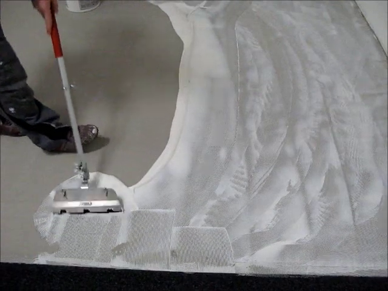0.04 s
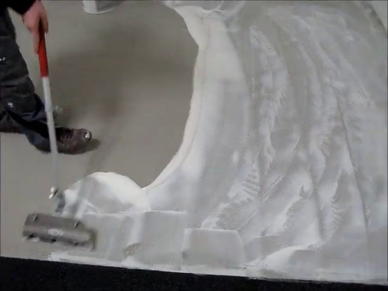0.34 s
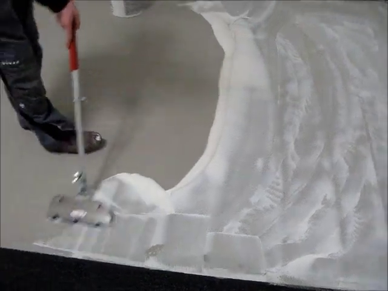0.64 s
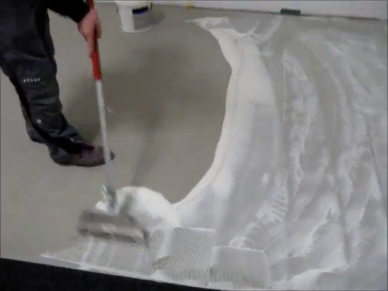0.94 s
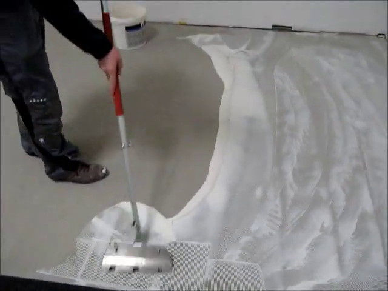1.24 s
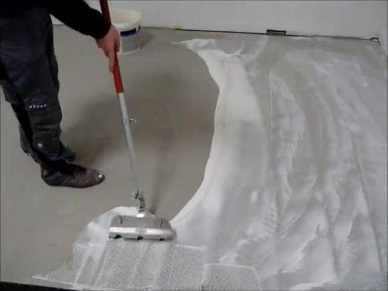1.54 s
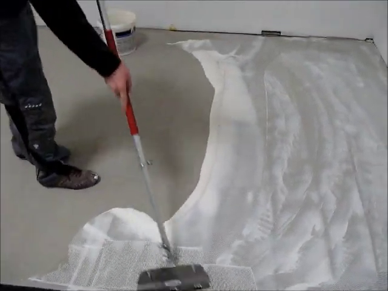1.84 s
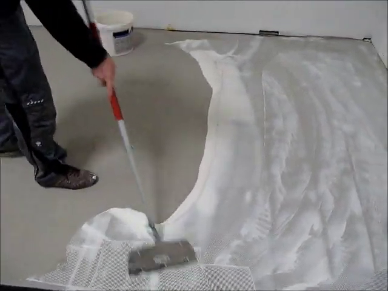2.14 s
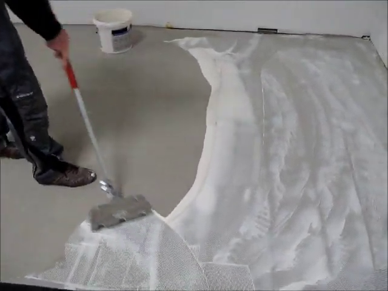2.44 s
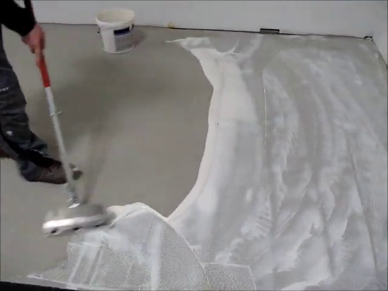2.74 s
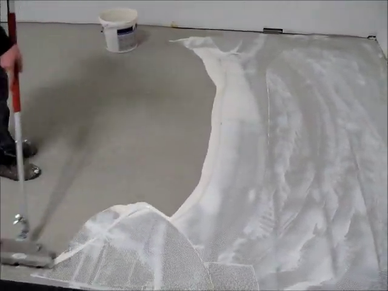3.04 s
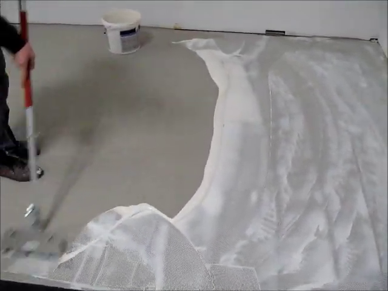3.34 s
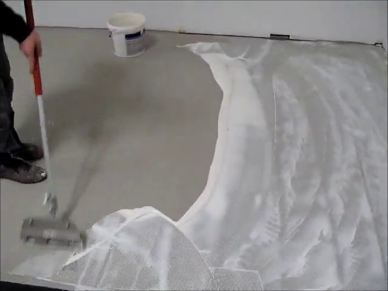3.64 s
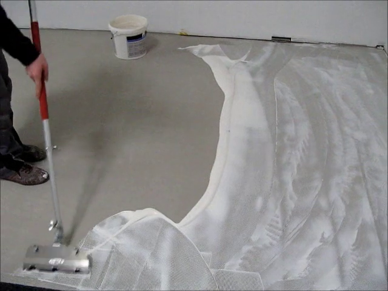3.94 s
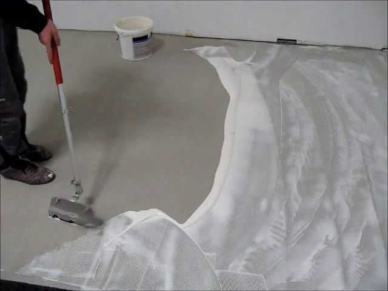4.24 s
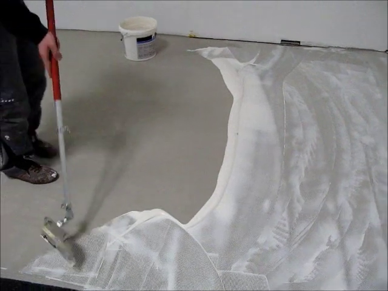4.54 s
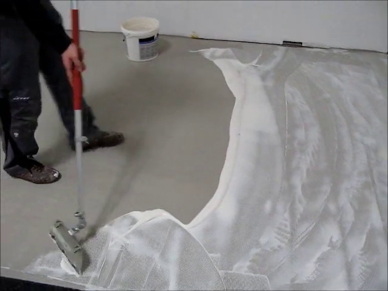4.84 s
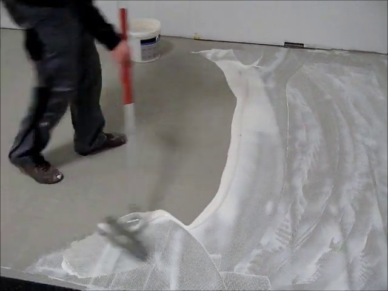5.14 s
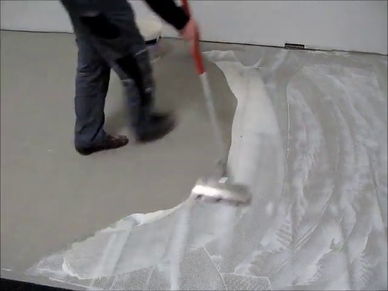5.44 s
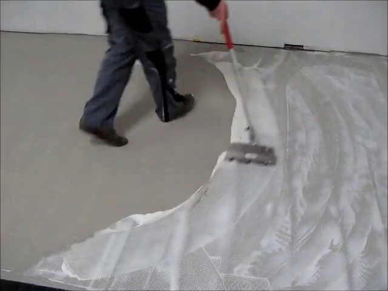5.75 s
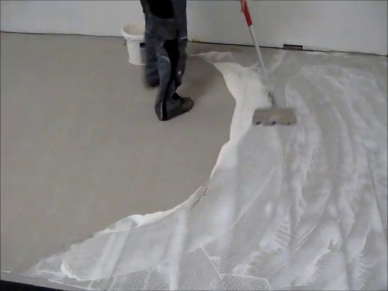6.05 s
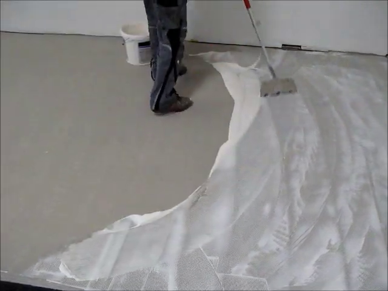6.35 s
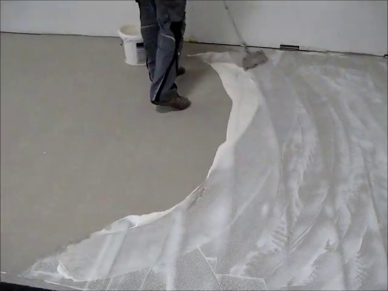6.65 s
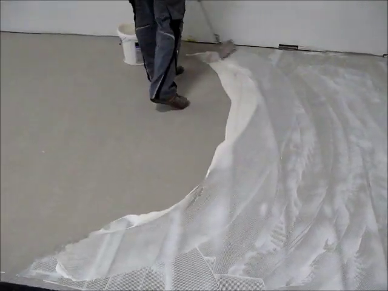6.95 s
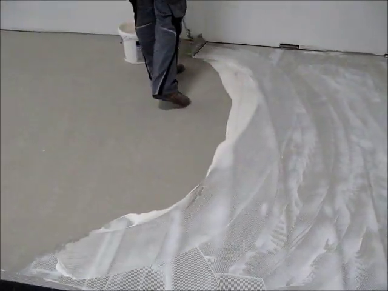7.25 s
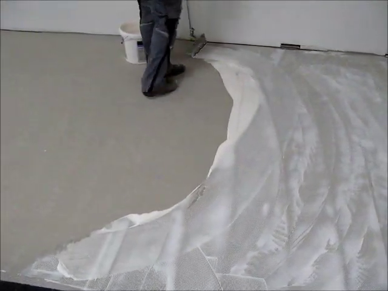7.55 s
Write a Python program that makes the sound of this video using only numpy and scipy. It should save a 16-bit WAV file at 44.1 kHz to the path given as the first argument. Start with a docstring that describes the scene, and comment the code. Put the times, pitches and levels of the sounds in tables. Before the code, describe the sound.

A notched steel spreader scrapes through wet adhesive on a cement floor, a gritty, juddering rasp with a fine hiss and faint crackle of paste. Strokes swell at about 0.6 and 1.3 seconds, with softer ones between 2 and 2.5. The blade clacks down on its corners around 1.1 and 1.8 seconds. The two strongest scrapes come at 3.4 and 4.1 seconds, with a firm clack between them and lighter knocks near 4.5. From about 4.8 seconds a long, uneven drag runs until 6, when a rubber sole gives one short, sharp, ringing squeak. The blade clacks at 6.5, then drags again until about 7.4. Near 7.7 seconds the steel edge hits something hard with a loud, bright clink. The bare room adds a short reverberation to everything, over quiet steady room noise and a barely audible high electrical whine.

```python
"""A bare room with a cement floor, where a notched steel spreader on a long handle is drawn through adhesive.
Friction of the teeth on grit makes a rasp, coloured by the modes of the blade and the air wedge under it.
The wet paste fizzes as it tears, and between strokes the blade clacks down on one corner, then the other.
The worker walks off with one long drag, a rubber sole squeaks by stick and slip, and the blade hits
something hard by the wall. The room reverberates over steady noise and a thin electrical whine."""
import sys
import numpy as np
from scipy import signal
from scipy.fft import rfft, irfft, next_fast_len
from scipy.io import wavfile
from scipy.ndimage import uniform_filter1d

SR = 44100
rng = np.random.default_rng(int(sys.argv[2]) if len(sys.argv) > 2 else 0)


def materialize(psi):
    """Save the field psi as 16-bit PCM at rate SR to the path in sys.argv[1].

    A 1-D psi becomes a single channel; in a 2-D psi each row is a channel.
    """
    bounded = np.clip(np.atleast_2d(psi).T, -1, 1)
    quanta = np.round(bounded * 32767).astype(np.int16)
    wavfile.write(sys.argv[1], SR, quanta)


N = 339129
TIME = np.arange(N) / SR


def scrape():
    """Friction noise: a faster blade is louder and meets more grit; catching teeth make it judder."""
    rasp_gain, fizz_gain, tilt = blade_motion()
    grains_per_s = 5000 + 250000 * rasp_gain
    judder = rms_one(from_db(drift(450) + 1.02 * drift(45)))
    rasp = rasp_gain * teeth(grains_per_s, tilt)
    paste = fizz_gain * fizz(grains_per_s)
    hollow = rasp_gain * air_wedge(grains_per_s, rasp_gain, tilt)
    return judder * (rasp + paste + hollow) + crackle(fizz_gain)


# swings of the arm: fastest_s, rise_s, fall_s, rasp_db, fizz_above_rasp_db
STROKES = [ (0.01, .05, 0.079, -39.5, -8.5), (0.32, 0.066, 0.094, -63.5, 11.5),
           (0.42, 0.056, 0.042, -49, -1), (0.644, 0.19, .115, -27.5, -4.5), (1.331, 0.2, 0.097, -33, -5),
           (1.995, 0.088, 0.034, -41, -6.5), (2.11, 0.13, 0.044, -49, -2.5), (2.35, 0.38, 0.17, -40, -5.5),
           (2.85, 0.092, 0.14, -59.5, 12), (3.405, .21, 0.092, -22.5, -3), (3.971, .065, 0.037, -34, -5),
           (4.09, 0.11, 0.093, -23.5, -4.5), (7.515, 0.061, 0.11, -60.5, 11.5), ]
# the long drag made while walking, in two halves: time_s, rasp_db, fizz_above_rasp_db
LONG_DRAG = [
    [(4.75, -49, 0.5), (4.806, -53, 5.5), (5.042, -32.5, -5), (5.184, -38.5, -9.5), (5.43, -29.5, -3),
     (5.448, -29, -4.5), (5.694, -48, -7.5), (5.918, -47, -3.5), (6.05, -40.5, -8.5)],
    [(6.62, -46, -8), (6.648, -44, -4.5), (6.836, -49.5, -5.5), (6.908, -38.5, -5.5), (7.08, -32.5, -5),
     (7.202, -37.5, -3), (7.306, -49.5, -11), (7.36, -55, -7)],
]
# lean of the blade in that drag: time_s, tilt (-1 flat to 1 tipped)
DRAG_TILT = [(5.05, -0.19), (5.3, 0.28), (5.45, -0.2), (5.65, 0.68), (6.5, 0.59), (7.0, -0.14), (7.2, 0.44)]

def blade_motion(push_power=1.74, lift_power=0.98, paste_loss_db=2):
    """Speed sets friction level: in a swing the blade speeds up, tips, runs out of paste and lifts."""
    time_s, drag_db, drag_fizz_db = np.transpose(np.vstack(LONG_DRAG))
    dragging = (TIME >= time_s[0]) & (TIME <= time_s[-1])
    drag_gain = dragging * from_db(np.interp(TIME, time_s, drag_db))
    rasp_gain = np.abs(uniform_filter1d(drag_gain, size=500))
    fizz_gain = rasp_gain * from_db(np.interp(TIME, time_s, drag_fizz_db))
    weighted_tilt = rasp_gain * np.interp(TIME, *np.transpose(DRAG_TILT))
    for fastest_s, rise_s, fall_s, rasp_db, fizz_db in STROKES:
        tilt = np.clip((TIME - fastest_s) / np.where(TIME < fastest_s, rise_s, fall_s), -1, 1)
        power = np.where(tilt < 0, push_power, lift_power)   # gentle swell, more abrupt end
        gain = from_db(rasp_db) * np.abs(np.cos(np.pi / 2 * tilt)) ** power
        rasp_gain += gain
        fizz_gain += gain * from_db(fizz_db - paste_loss_db * tilt)
        weighted_tilt += gain * tilt
    return rasp_gain, fizz_gain, weighted_tilt / (rasp_gain + 1e-9)


# spectrum of teeth on cement: frequency_hz, density_db
RASP_SPECTRUM = [(530, -10), (900, -21), (982, 9), (1210, 5), (1510, 1.5), (1720, 4.5), (2310, 0),
                 (2520, -14), (3030, 2), (7060, -7), (12000, -42), (15600, -42), (22000, -120)]
# modes of the rubbed blade: pitch_hz, width_hz, level_db
BLADE_MODES = [(1182, 30, 7), (1730, 150, -13.5), (2140, 100, -4), (2586, 104, 7), (3000, 320, 3.5),
               (3690, 360, 1), (4330, 230, -1), (5240, 40, -24), (5710, 85, -6)]

def teeth(grains_per_s, tilt, lift_loss_db=2):
    """Forced vibration: tiny impacts on grit rasp and drive the blade, less as the teeth tip away."""
    grit = coloured(grains(grains_per_s, spread_db=2), RASP_SPECTRUM)
    rasp = cut(cut(grit, 1870, "high"), 9900, "low")
    blade = rms_one(ring(grains(grains_per_s, spread_db=4), BLADE_MODES))
    return (from_db(-4) * rasp + from_db(-7.5) * blade) * from_db(-lift_loss_db * tilt)


def air_wedge(grains_per_s, rasp_gain, tilt, brisk_db=-25, creep_db=-43):
    """Cavity resonance: two peaks of the air under the blade sink as it slows and tips over."""
    pace_db = 20 * np.log10(np.maximum(rasp_gain, from_db(creep_db))) - brisk_db
    lower_hz = 1126 * 2 ** (0.08 * pace_db - 0.19 * tilt) * (1 + 0.09 * drift(22))
    upper_hz = 2970 * 2 ** (0.1 * pace_db - 0.71 * tilt)
    lower_db = -11 - 0.37 * pace_db + 6.5 * tilt   # stands out on a slow, tipped blade
    upper_db = -5.5 + 4 * tilt
    broad = glide(grains(grains_per_s, spread_db=1.5), lower_hz, width_hz=520)
    broad = cut(broad, [560, 1500], "band", order=4)
    # now and then the lower peak narrows to a short groan
    catching = np.clip(0.14 + 0.36 * drift(24), 0, 1)
    narrow = glide(grains(grains_per_s, spread_db=-3), lower_hz, width_hz=46)
    groan = catching * glide(narrow, lower_hz, width_hz=470)
    lower = from_db(-3.5) * broad + from_db(-3) * groan
    upper = glide(grains(grains_per_s, spread_db=1), upper_hz, width_hz=1740)
    upper = glide(upper, upper_hz, width_hz=3000)
    return from_db(lower_db) * lower + from_db(upper_db) * upper


# spectrum of tearing paste: frequency_hz, density_db
PASTE_SPECTRUM = [(4000, -5.5), (7000, -3.5), (9500, -3), (11700, 1.5), (13200, -4.5), (15500, -13)]

def fizz(grains_per_s):
    """Shot noise: countless tiny tears in the wet paste merge into a high hiss."""
    return cut(coloured(grains(grains_per_s, spread_db=-4.5), PASTE_SPECTRUM), 4400, "high")


def crackle(fizz_gain, decay_s=0.001):
    """Rupture: threads of paste snap one by one, standing out most when the blade moves slowly."""
    snaps = np.abs(grains(per_s=37, spread_db=0.5))
    envelope = signal.lfilter([1], [1, -np.exp(-1 / (decay_s * SR))], snaps + 1e-18)
    bursts = envelope * rng.standard_normal(N)
    return from_db(-39.5) * np.sqrt(fizz_gain) * coloured(bursts, PASTE_SPECTRUM)


# blade set down or jolted: start_s, clack_db, contact_hz, thump_db, tick_db, second_above_first_db
KNOCKS = [ (0.395, -34, 990, -47, -46, -10), (1.075, -34, 2630, -50, -26.5, -7),
          (1.102, -27, 2110, -39.5, -21, -4), (1.114, -27.5, 980, -44, -22.5, -1),
          (1.831, -30, 1130, -43, -23, 1), (3.103, -36.5, 1090, -57, -36, 1.5),
          (3.212, -43, 3000, -67, -29, 0), (3.808, -38, 1500, -52, -36, -12),
          (3.828, -20, 1340, -44.5, -19.5, -4), (3.870, -42, 1000, -45, -23.5, -14),
          (4.505, -34, 2200, -60, -31, -7), (4.683, -33, 1540, -55, -53, 6.5),
          (5.308, -31, 3000, -58, -21, -22), (6.548, -23, 2900, -64, -21.5, -24),
          (6.658, -34, 2980, -58, -31, -17), ]
# modes of the blade on its swivel: pitch_hz, width_hz, level_db
SWIVEL_MODES = [(616, 200, 3), (964, 244, 5), (1380, 380, 0.5), (2200, 840, -6), (3060, 330, -3),
                (3930, 350, -7)]
# modes of handle and floor: pitch_hz, width_hz, level_db
HANDLE_MODES = [(110.6, 13, -7), (179, 5.6, 1), (211, 5.5, 6.5), (290, 19, -0.5)]

def knocks(corner_lag_s=0.012):
    """Impact excitation: each corner clacks in the swivel, thumps the handle and ticks at the edge."""
    out = np.zeros(N)
    for first_s, clack_db, contact_hz, thump_db, tick_db, second_db in KNOCKS:
        for start_s, corner_db in ((first_s, 0), (first_s + corner_lag_s, second_db)):
            swivel = ring(contact(decay_s=0.0035, grit=0.43), SWIVEL_MODES)
            # the harder the contact, the higher the modes that it stirs
            clack = signal.lfilter(*resonator(contact_hz, width_hz=1840), swivel)
            thump = ring(contact(decay_s=0.0025, grit=0.099), HANDLE_MODES)
            tick = cut(contact(decay_s=0.00093, grit=0.2), [3000, 14500], "band")
            add(out, start_s, clack, clack_db + corner_db)
            add(out, start_s, thump, thump_db + corner_db)
            add(out, start_s, tick, tick_db + corner_db)
    return out


# hits of bare steel on something hard: start_s, level_db
CLINKS = [(7.6772, -23), (7.6804, -8.5), (7.6832, -13)]
# modes of the steel edge: pitch_hz, width_hz, level_db
EDGE_MODES = [(2360, 990, -7), (4800, 620, -7.5), (7400, 1000, -1), (10800, 1000, -3)]

def clinks():
    """Contact chatter: the edge strikes in quick succession, exciting high, heavily damped modes."""
    out = np.zeros(N)
    for start_s, level_db in CLINKS:
        add(out, start_s, ring(contact(decay_s=0.0014, grit=0.54), EDGE_MODES), level_db)
    return out


# slips of a rubber sole: start_s, length_s, pitch_hz, swing_ratio, level_db, overtones_db
SQUEAKS = [ (4.745, 0.03, 2700, .008, -49, -19), (6.086, 0.033, 2140, .065, -17, -1),
           (7.551, .035, 1990, .01, -47, -15), ]
# pitch bend at the start, the loudest moment, the grip and the end: share_of_swing
SQUEAK_BEND = [-1.3, -0.057, 0.89, 0.23]
# harmonics 2 to 5: level_db
SQUEAK_HARMONICS = [2, -2, -18, -20]

def squeaks(jitter=0.0307, flutter_db=1.2, octave_swell_db=15):
    """Stick-slip oscillation: a rough tone climbs until the sole grips, with a rubbing hiss."""
    out = np.zeros(N)
    waver = 1 + jitter * drift(1300)
    rub = from_db(-20) * rms_one(cut(rng.standard_normal(N), [7500, 13000], "band"))
    stages = [0, 0.31, 0.83, 1]   # start, loudest, grip and end, as shares of the length
    for start_s, length_s, pitch_hz, swing, level_db, overtones_db in SQUEAKS:
        progress = np.clip((TIME - start_s) / length_s, 0, 1)
        bent_hz = pitch_hz * (1 + swing * np.interp(progress, stages, SQUEAK_BEND))
        phase = 2 * np.pi * np.cumsum(bent_hz * waver) / SR
        octave, *higher = [from_db(db) * np.sin(k * phase) for k, db in enumerate(SQUEAK_HARMONICS, 2)]
        overtones = octave * from_db(octave_swell_db * (progress - 0.5)) + sum(higher) + rub
        envelope = np.interp(progress, stages, [0, 1, 0.33, 0])
        out += from_db(level_db) * envelope * (np.sin(phase) + from_db(overtones_db) * overtones)
    return out * rms_one(from_db(flutter_db * drift(700)))


# narrow resonances of the room: pitch_hz, width_hz, level_db
ROOM_MODES = [(2060, 6.4, 11.5), (2098, 6, 6.5), (2231, 8.5, -3.5), (2390, 9, 14), (4218, 5.8, -3),
              (4150, 13, 7), (4520, 9, -6), (6590, 22, 6.5)]

def room_ringing(sole):
    """Free decay: lightly damped room modes ring on after a squeak."""
    return from_db(3.5) * ring(sole, ROOM_MODES)


# reverberation time: frequency_hz, t60_s
ROOM_T60 = [(150, 0.87), (1300, 0.8), (3500, 0.55), (7000, 0.44), (14000, 0.35)]

def room(x, wet_db, early, early_s=0.011, build_s=0.0018):
    """Reverberation: direct sound, early reflections, then a tail whose treble dies first."""
    t, tail = TIME[:SR], 0
    edges_hz = np.geomspace(70, 18000, 11)
    for low, high in zip(edges_hz, edges_hz[1:]):
        band = cut(rng.standard_normal(SR), [low, high], "band")
        tail = tail + band * np.exp(-np.log(1000) * t / at_hz(ROOM_T60, np.sqrt(low * high)))
    tail = tail * (1 - np.exp(-t / build_s)) * (1 + early * np.exp(-t / early_s))
    return x + from_db(wet_db) * signal.fftconvolve(x, tail / np.linalg.norm(tail))[:N]


# spectrum of the room noise: frequency_hz, density_db
AIR_SPECTRUM = [(18, -69), (30, -35), (90, -14.5), (179, -3), (295, -1), (473, -5), (540, -5), (616, -6),
                (684, -3), (1280, -7), (4420, -14.5), (8080, -19), (9970, -20.5), (14800, -23.5),
                (16000, -36)]
# electrical whine: pitch_hz, level_db
WHINE = [(14400, -78)]

def background():
    """Noise floor: steady broadband room noise with a thin electrical pure tone."""
    air = from_db(-50) * coloured(rng.standard_normal(N), AIR_SPECTRUM)
    whine = sum(from_db(db) * np.sqrt(2) * np.sin(2 * np.pi * hz * TIME) for hz, db in WHINE)
    return air + whine


def grains(per_s, spread_db):
    """Poisson process: random clicks of uneven size; rms 1."""
    sizes = from_db(spread_db * np.minimum(rng.exponential(1, N), 4)) * rng.choice([-1, 1], N)
    return rms_one(sizes * (rng.random(N) < per_s / SR) / np.sqrt(per_s))


def contact(decay_s, grit):
    """Impulsive force: a sharp push, then a short crunch of grit."""
    t = TIME[:SR // 3]
    return (t == 0) + grit * rng.standard_normal(len(t)) * np.exp(-t / decay_s)


def drift(rate_hz):
    """Random modulation: interpolated noise; rms 1."""
    steps = rng.standard_normal(N // 8)
    return rms_one(np.interp(TIME * rate_hz, np.arange(len(steps)), steps))


def resonator(hz, width_hz):
    """Damped oscillator: two-pole filter coefficients with peak gain 1."""
    r = np.exp(-np.pi * width_hz / SR)
    return (1 - r * r) / 2 * np.array([1, 0, -1]), [1, -2 * r * np.cos(2 * np.pi * hz / SR), r * r]


def ring(x, modes):
    """Modal sum: parallel resonances of alternating sign."""
    return sum((-1) ** k * from_db(db) * signal.lfilter(*resonator(hz, width_hz), x + 1e-18)
               for k, (hz, width_hz, db) in enumerate(modes))


def glide(x, hz, width_hz, block=256):
    """Time-varying resonance: the centre moves while the ringing carries on; rms 1."""
    out, state = np.zeros(N), np.zeros(2)
    for i in range(0, N, block):
        out[i:i + block], state = signal.lfilter(*resonator(hz[i], width_hz), x[i:i + block], zi=state)
    return rms_one(out)


def coloured(x, spectrum):
    """Spectral shaping of a steady sound; rms 1."""
    size = next_fast_len(N)
    gain = from_db(at_hz(spectrum, np.arange(size // 2 + 1) * SR / size))
    return rms_one(irfft(rfft(x, size) * gain, size)[:N])


def cut(x, hz, kind, order=2):
    """Butterworth filtering."""
    return signal.sosfilt(signal.butter(order, hz, kind, fs=SR, output="sos"), x)


def at_hz(points, hz):
    """Interpolation along a log-frequency axis."""
    known_hz, values = np.transpose(points)
    return np.interp(np.log(np.maximum(hz, 1)), np.log(known_hz), values)


def add(track, start_s, sound, peak_db):
    """Superposition of one sound at a given time and peak level."""
    start = round(start_s * SR)
    part = sound[:max(N - start, 0)]
    track[start:start + len(part)] += from_db(peak_db) * part / np.abs(sound).max()


def from_db(db):
    """Decibels to amplitude ratio."""
    return 10 ** (np.asarray(db) / 20)


def rms_one(x):
    """Normalisation to unit rms."""
    return x / np.sqrt(np.mean(x ** 2) + 1e-20)


def scene():
    """Superposition: all sources share one room, the impacts and the sole wetter than the scrape."""
    scraping = room(scrape(), wet_db=-8.5, early=0.23)
    impacts = room(knocks() + clinks(), wet_db=-2, early=1.7)
    sole = from_db(2) * squeaks()
    squeaking = room(sole, wet_db=-2, early=0.27) + room_ringing(sole)
    return (scraping + impacts + squeaking + background())[None]


def record(dry):
    """Band limiting: a steep low-pass filter removes the highest treble."""
    cutoff_hz = 15900
    return signal.sosfilt(signal.ellip(10, 0.1, 80, cutoff_hz, fs=SR, output="sos"), dry)


dry = scene()
out = record(dry)
materialize(out)
```